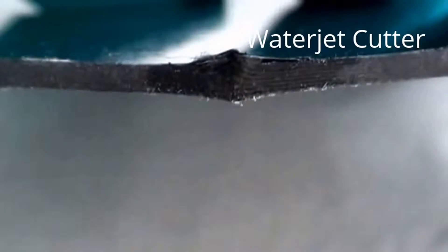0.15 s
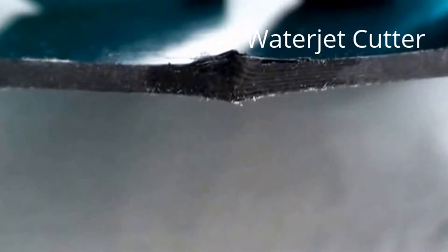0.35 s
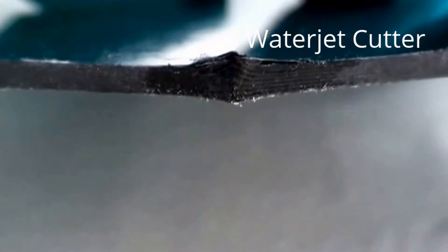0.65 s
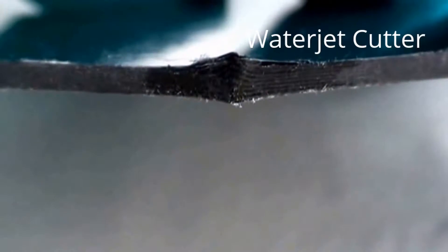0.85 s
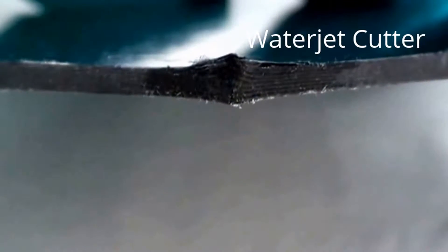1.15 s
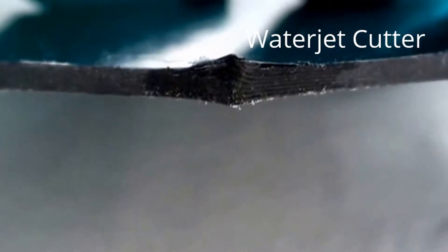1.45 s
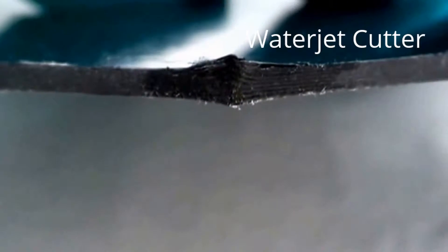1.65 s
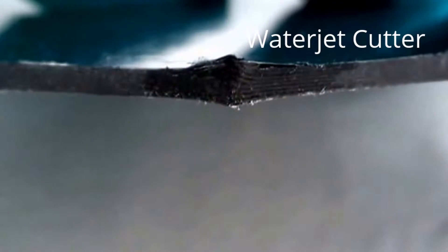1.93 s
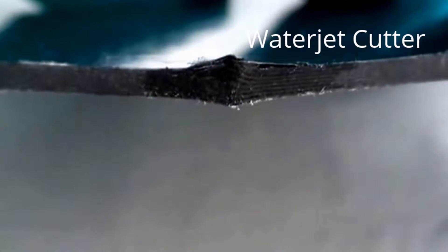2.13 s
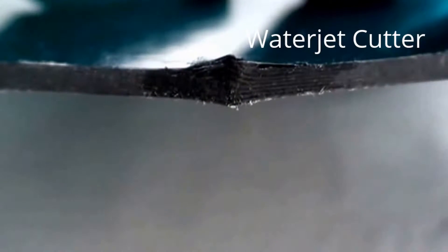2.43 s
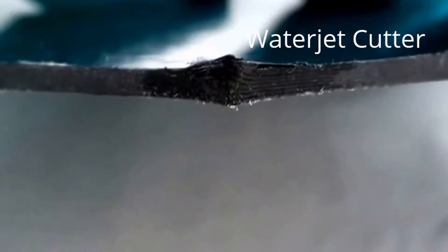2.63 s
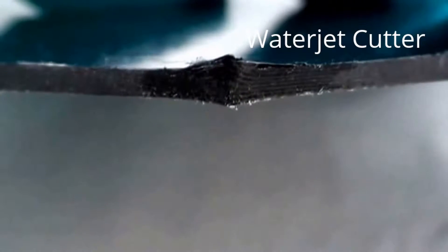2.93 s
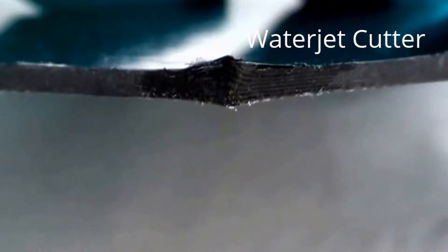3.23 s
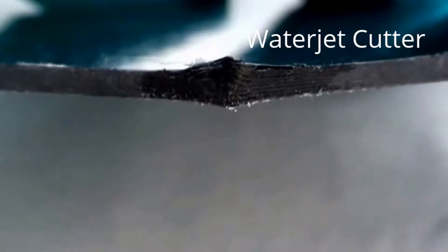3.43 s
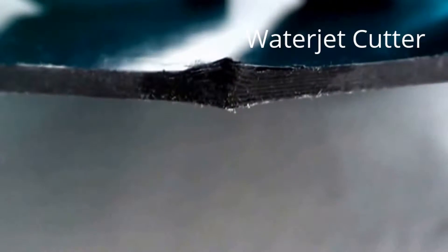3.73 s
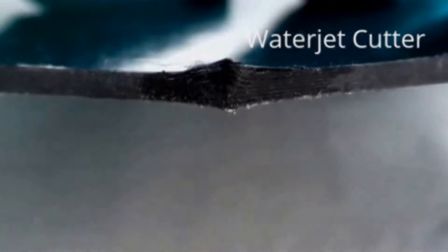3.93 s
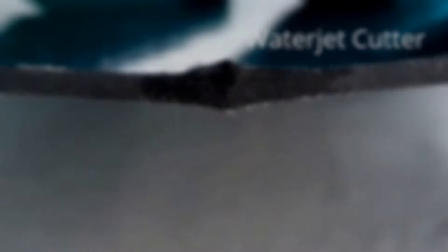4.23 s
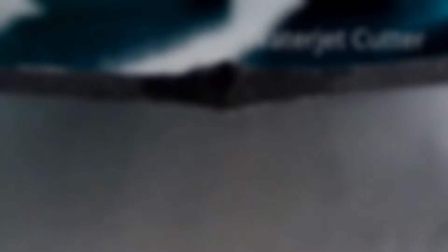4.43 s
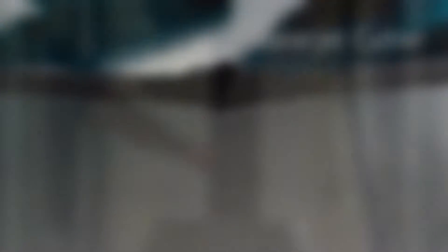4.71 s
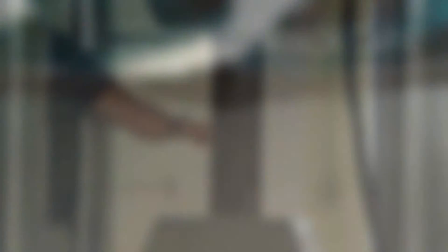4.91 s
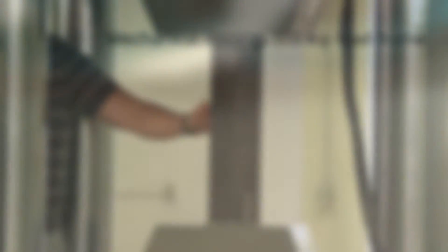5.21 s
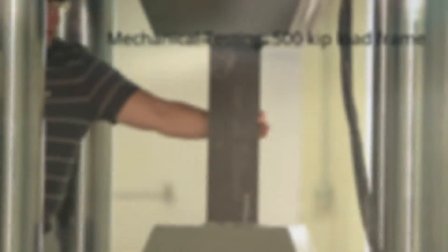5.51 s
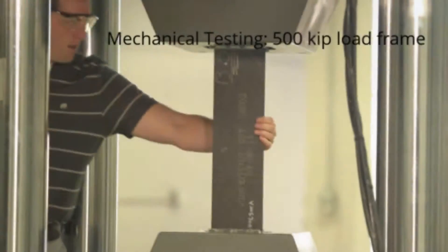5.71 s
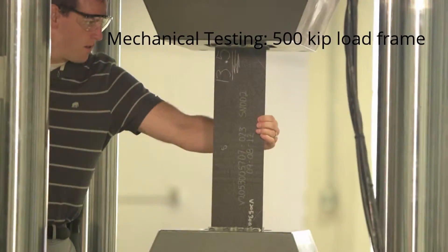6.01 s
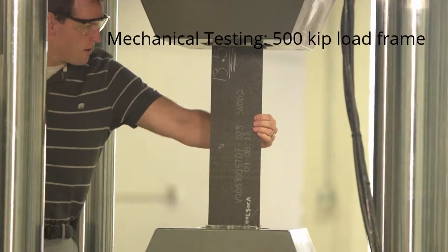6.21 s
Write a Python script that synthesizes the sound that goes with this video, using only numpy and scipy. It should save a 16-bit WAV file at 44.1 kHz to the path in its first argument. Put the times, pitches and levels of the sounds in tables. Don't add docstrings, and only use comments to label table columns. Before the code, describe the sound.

A waterjet cutter runs continuously in a workshop, heard close in stereo. Broad turbulent hiss lies over a heavier low roar of pump and fans, with a steady motor hum and many droning tones. Very early the sound abruptly becomes slightly more distant, then holds steady with gentle swells and beating until a slow fade to silence.

```python
import sys
import numpy as np
from scipy import signal
from scipy.io import wavfile
from scipy.ndimage import uniform_filter1d

SR = 44100
rng = np.random.default_rng(int(sys.argv[2]) if len(sys.argv) > 2 else 0)


def file_out(sig):
    cols = np.atleast_2d(sig).T
    lim = np.clip(cols, -1, 1)
    pcm = np.round(lim * 32767).astype(np.int16)
    wavfile.write(sys.argv[1], SR, pcm)


def gain_from_decibels(decibels):
    exponent = np.asarray(decibels, float) / 20
    return 10 ** exponent


N = 280476
CHANGE_S = 0.258
STEPS_S = np.arange(0, N / SR + 0.1, 0.006)


def evened(x):
    return x / np.sqrt(np.mean(x ** 2))


def read(points, hz):
    f, value = np.transpose(points)
    return np.interp(np.log(hz + 1), np.log(f + 1), value)


def drift(t, top_hz, count=16):
    hz = np.geomspace(top_hz / 20, top_hz, count)
    waves = np.sin(2 * np.pi * (t[:, None] * hz + rng.random(count)))
    return evened(waves @ hz ** -0.5)


def bumps_db(hz, rows):
    return sum(db / (1 + (2 * (hz - f) / width) ** 2) for f, width, db in rows)


def nearness(t):
    return np.clip((CHANGE_S - t) / 0.0081 + 0.5, 0, 1)


def placed(hz, db):
    # centre in Hz, width in Hz, gain in dB.
    standing = [(124, 25, -26.5), (285, 62, -7.5), (480, 40, 6), (596, 40.5, 0.5), (860, 60, -7),
                (1800, 170, -3)]
    near_gain_db = 2.5 + bumps_db(hz, standing)
    return db + near_gain_db * nearness(STEPS_S)


def tone(hz, db, lean_db, wander_hz, flutter_db, start_turns):
    t = np.arange(N) / SR
    pitch = hz + wander_hz * drift(STEPS_S, 1.982)
    level = gain_from_decibels(db + flutter_db * drift(STEPS_S, 6.0))
    turns = np.cumsum(np.interp(t, STEPS_S, pitch)) / SR + start_turns
    angle = (2 * np.pi * (turns - np.floor(turns))).astype(np.float32)
    level = np.sqrt(2) * np.interp(t, STEPS_S, level).astype(np.float32)
    lag = rng.normal(0, 0.21) * min(hz / 1500, 1)
    sides = np.float32([[0.5], [-0.5]])
    swing = np.cos(sides * lag) * np.cos(angle) - np.sin(sides * lag) * np.sin(angle)
    return gain_from_decibels(sides * lean_db) * swing * level


def roar_and_hiss():
    # frequency in Hz, level in dB per Hz.
    noise_spectrum = [(24, -75), (45, -63), (75, -57.5), (110, -52.5), (150, -51), (200, -53), (240, -57),
                      (300, -51.5), (345, -55.5), (450, -54), (560, -53), (720, -56), (780, -57.5), (1050, -58.5),
                      (1150, -62), (1600, -64.5), (2200, -66), (2550, -67.5), (3200, -68.5), (3800, -71.5),
            (4600, -70.5), (5500, -72.5), (6100, -72), (7200, -73.5), (8600, -75.5), (10000, -82.5),
            (11500, -85), (15600, -88)]
    # centre in Hz, width in Hz, gain in dB.
    casing = [(78.4, 6.8, 0), (260, 30, 4), (302.3, 32, 4.5), (337, 5.9, 1), (580, 37, 2), (705, 26, 2.5),
              (2255, 120, 3.5), (6160, 200, 3)]
    # frequency in Hz, left-right correlation (0 to 1).
    likeness = [(60, .9996), (240, 1), (480, 0.96), (950, 0.86), (1890, 0.81), (3770, 0.79), (7520, 0.8)]
    # frequency in Hz, left over right in dB.
    balance = [(120, -0.5), (240, 1.04), (480, 0), (950, -0.5), (1890, -1), (3770, -0.5), (7520, -1),
               (15000, 4)]
    # frequency in Hz, gain in dB.
    near_noise = [(40, -4.5), (150, 3.5), (300, 0), (480, 5), (1000, 2.5), (8000, 3)]

    frames, hz = N // 1024 + 5, np.fft.rfftfreq(4096, 1 / SR)
    t = np.arange(frames) * 1024 / SR
    a, b, c, d, patches = rng.standard_normal((frames, len(hz), 5)).T
    patches = uniform_filter1d(patches, size=40, axis=0)
    patches = evened(uniform_filter1d(patches, size=3, axis=1))
    ripple_db = 1.5 * rng.standard_normal(len(hz))
    steady_db = read(noise_spectrum, hz) + bumps_db(hz, casing) + ripple_db
    field_db = steady_db[:, None] + 0.54 * patches + 0.13 * drift(t, 2.7)

    same = np.clip(read(likeness, hz), -1, 1)[:, None]
    left = a + 1j * b
    right = same * left + np.sqrt(1 - same ** 2) * (c + 1j * d)
    lean = gain_from_decibels(np.outer([0.5, -0.5], read(balance, hz)))[:, :, None]
    far = np.array([left, right]) * gain_from_decibels(field_db) * lean
    extra = far * (gain_from_decibels(read(near_noise, hz))[:, None] - 1)
    both = signal.istft(np.array([far, extra]), nperseg=4096, noverlap=3072)[1]
    far, extra = both[..., :N]
    per_hz = np.sqrt(SR / 4096) * 1.173
    return per_hz * (far + extra * nearness(np.arange(N) / SR))


def pump():
    stroke_hz = 298.1
    # multiple of the stroke, level in dB, flutter in dB.
    strokes = [
        (1, -29, 2.1),
        (2, -40, 5),
    ]
    # time in seconds, load in dB.
    load = [
        (.3, -2),
        (.9, 3.5),
        (1.5, -2),
        (2.0, -2),
        (2.75, 3),
        (3.4, 1),
        (3.9, 2.5),
        (4.3, -2),
        (5.3, 1.5),
    ]
    load_db = np.interp(STEPS_S, *np.transpose(load))
    total = 0
    for (k, db, flutter_db), follow in zip(strokes, (1, -1.4)):
        hz = k * stroke_hz
        level_db = placed(hz, db + follow * load_db)
        total = total + tone(hz, level_db, -0.4 * k, 0.15 * k, flutter_db, rng.random())
    return total


def rotors():
    # frequency in Hz, level in dB, left-right in dB, wander in Hz.
    shafts = [(39.7, -57.0, -0.2, 0.66), (42.2, -55.5, 0.6, 0.34), (50.7, -47.5, 0.0, 0.17),
              (77.8, -44.8, 0.3, 1.25), (90.9, -40.0, 0.0, 0.1), (131.2, -45.1, 0.0, 0.1),
              (143.4, -42.8, 0.1, 0.1), (215.1, -40.1, 0.4, 0.1), (220.7, -40.5, 0.3, 0.1),
              (227.8, -34.2, 0.3, 0.38), (232.0, -38.4, 0.1, 0.1), (238.4, -37.5, 0.3, 0.1),
              (363.6, -41.9, 0.1, 0.24), (538.8, -42.0, 0.1, 0.1), (645.4, -45.8, -0.7, 0.1),
              (727.0, -35.2, 0.9, 0.48), (732.7, -39.3, -0.9, 0.83), (816.1, -47.1, 1.0, 0.8),
              (860.5, -44.8, 1.1, 0.14), (872.8, -49.8, -1.0, 0.1), (909.0, -42.3, 0.4, 0.69),
              (1633.7, -52.3, -0.1, 1.0), (2056.5, -52.0, -4.0, 1.0), (2940.2, -58.3, -0.6, 0.31),
              (3025.9, -55.9, -2.0, 0.1), (3289.7, -59.7, -4.9, 0.2), (4369.2, -57.7, 1.1, 0.52),
              (12004.7, -62.7, 0.1, 0.21)]
    return gain_from_decibels(-0.03) * sum(tone(hz, placed(hz, db), lean_db, 0.32 * wander_hz, 1.4, rng.random())
                            for hz, db, lean_db, wander_hz in shafts)


def shaft_pair():
    in_step_s = 0.117
    # frequency in Hz, level in dB, left-right in dB.
    pair = [
        (272.7, -35.1, -.5),
        (274.6, -35.0, 0),
    ]
    return sum(tone(hz, placed(hz, db), lean_db, 0, 0.74, -hz * in_step_s)
               for hz, db, lean_db in pair)


def buzz():
    pull_hz = 119.96
    # multiple of the pull rate, level in dB, left-right in dB.
    lines = [(1, -29.3, 0.0), (2, -38.5, 0.4), (3, -41.3, 1.4), (6, -42.8, -0.7), (9, -48.8, -2.6),
             (10, -45.4, -1.3), (11, -46.4, -2.4), (12, -48.1, -4.6), (15, -40.1, -3.7), (16, -47.6, -1.0),
             (17, -42.0, -3.8), (18, -55.0, -3.0), (23, -55.7, -0.4), (24, -51.7, 0.2), (26, -55.6, 3.8),
             (28, -56.1, -4.3), (32, -51.7, -0.6), (34, -59.6, -2.5), (35, -52.1, 1.5), (38, -53.4, -5.1),
             (39, -49.4, -2.8), (40, -61.3, 0.4), (41, -56.0, -0.9), (42, -62.2, -3.0), (43, -52.1, 0.1),
             (44, -58.2, -2.6), (46, -64.0, 3.9), (47, -59.4, -1.2), (48, -61.4, 0.5), (54, -58.1, -2.2)]
    return gain_from_decibels(0.02) * sum(tone(k * pull_hz, placed(k * pull_hz, db), lean_db, 0, 0.32, rng.random())
                           for k, db, lean_db in lines)


def scene():
    return roar_and_hiss() + pump() + rotors() + shaft_pair() + buzz()


def faded(x):
    from_s, to_s = 3.827, 5.835
    gone = np.clip((np.arange(N) / SR - from_s) / (to_s - from_s), 0, 1)
    return x * np.cos(np.pi / 2 * gone) ** 1.905


def narrowed(x):
    # start in seconds, edge in Hz.
    width_edge = [
        (0, 4600),
        (.6, 8700),
    ]
    mid, side = (x[0] + x[1]) / 2, (x[0] - x[1]) / 2
    hz, t, z = signal.stft(side, SR, nperseg=2048)
    early = t < 0.6

    start_s, edge_hz = np.transpose(width_edge)
    draw = rng.random((len(t), 3))
    leaps = draw[:, 0] < np.where(early, 0.05, 0.17)
    leap_hz = leaps * (600 + 6000 * draw[:, 1]) + 400 * (draw[:, 2] - 0.5)
    edge_hz = edge_hz[np.searchsorted(start_s, t, "right") - 1] + leap_hz

    holes = rng.random((len(t), len(hz) // 8 + 1)).T < np.where(early, 0.14, 0.06)
    holes = np.repeat(holes, 8, 0)[:len(hz)]
    kept = (hz[:, None] < edge_hz) & ~holes
    side = signal.istft(z * kept, SR, nperseg=2048)[1][:N]
    return np.array([mid + side, mid - side])


def low_pass(x):
    return signal.sosfilt(signal.butter(12, 15770, fs=SR, output="sos"), x)


def record(dry):
    mix = narrowed(faded(dry))
    return low_pass(mix)


dry = scene()
out = record(dry)
file_out(out)
```